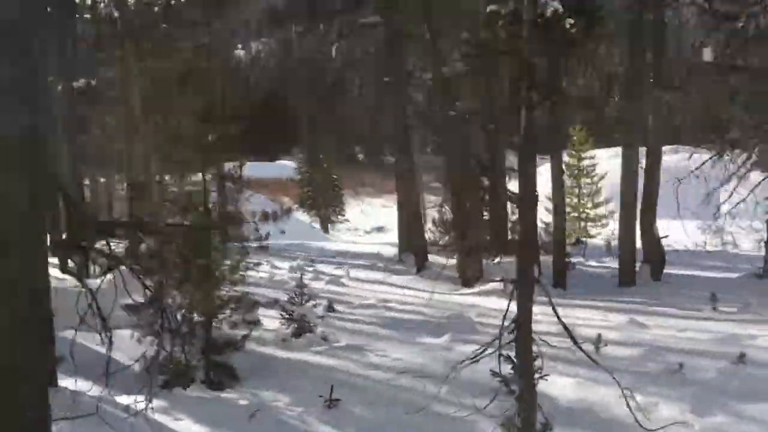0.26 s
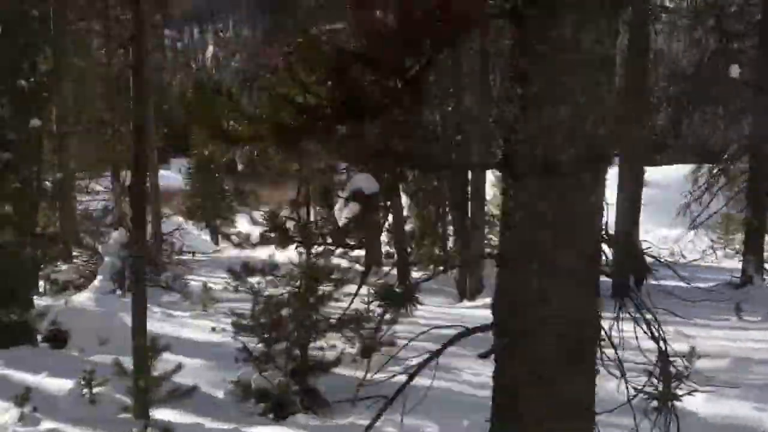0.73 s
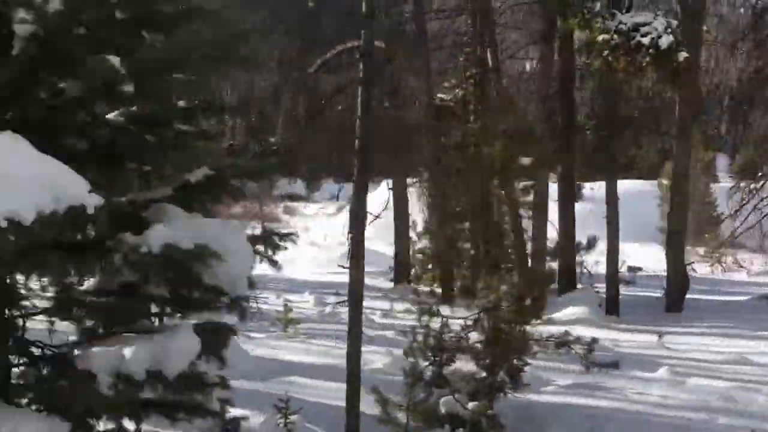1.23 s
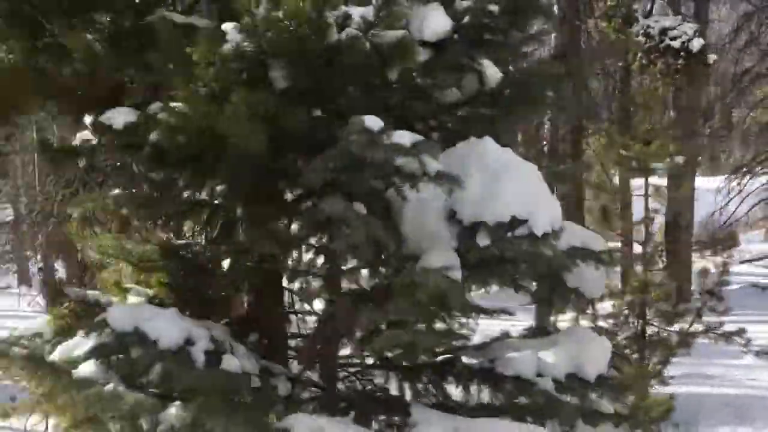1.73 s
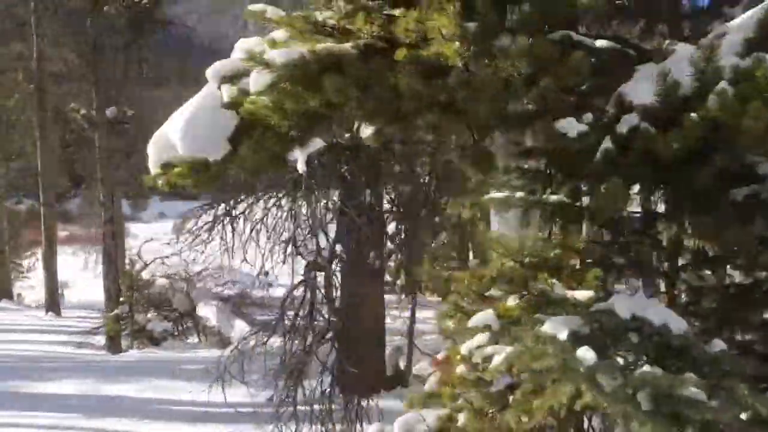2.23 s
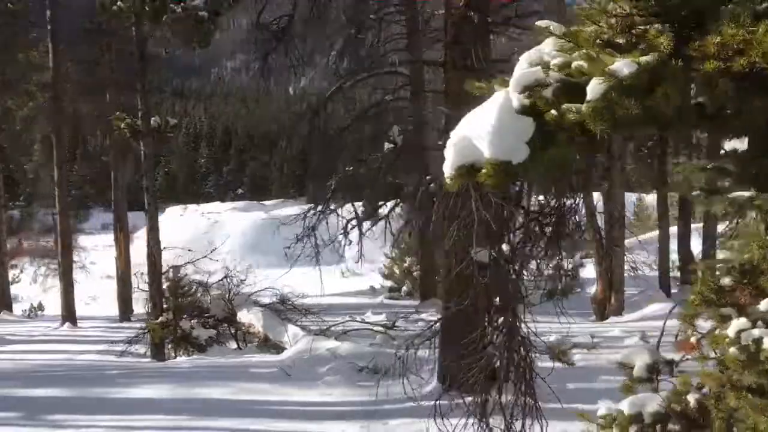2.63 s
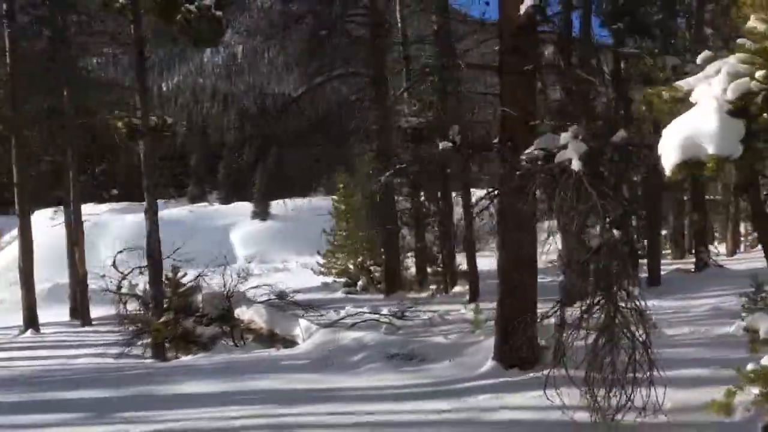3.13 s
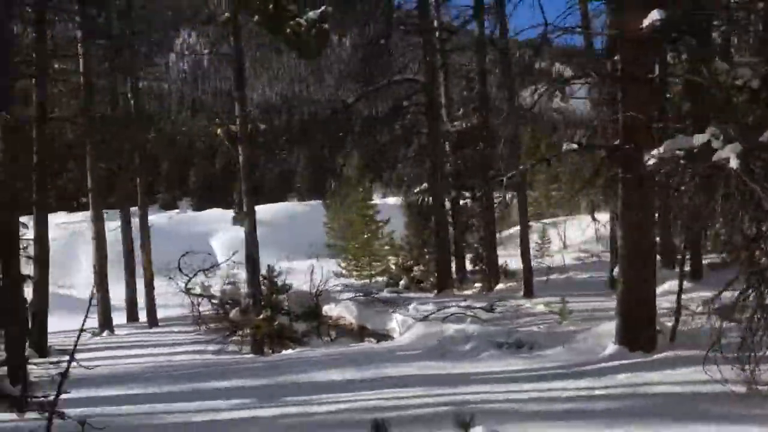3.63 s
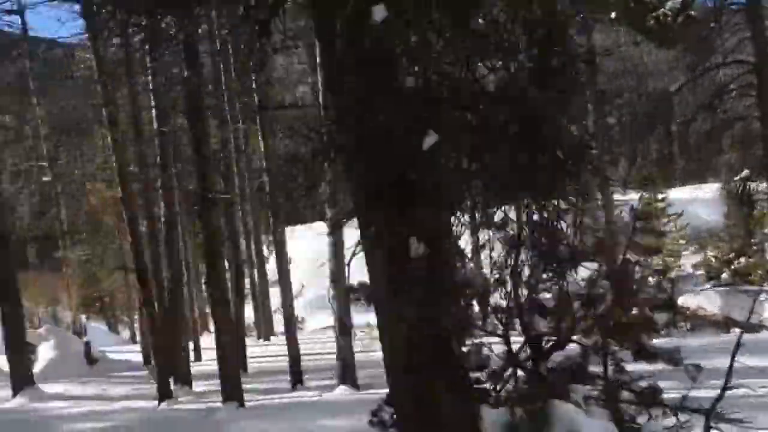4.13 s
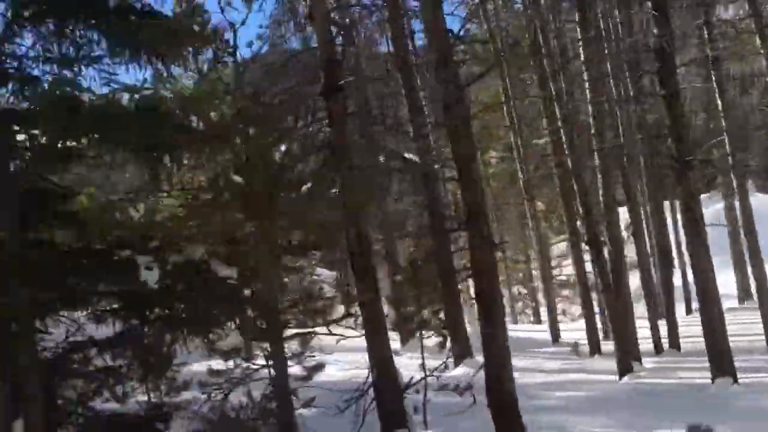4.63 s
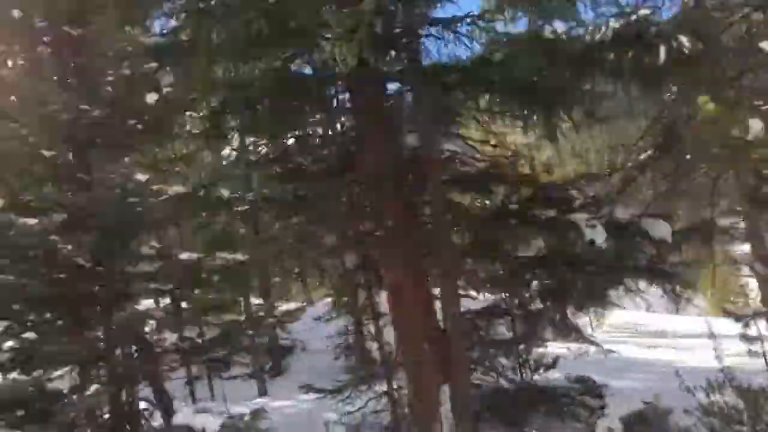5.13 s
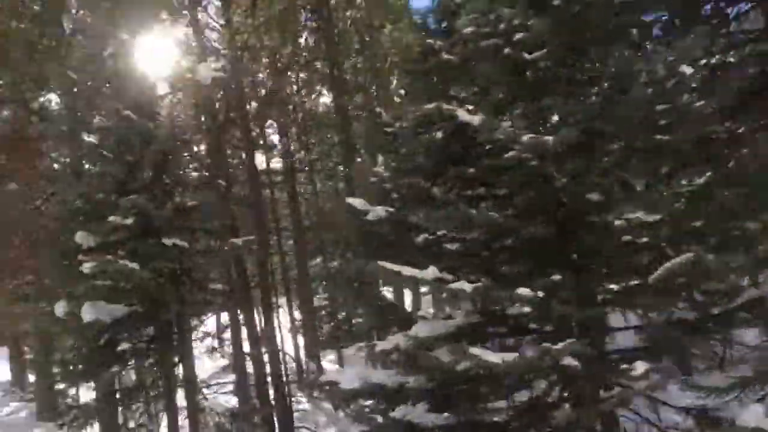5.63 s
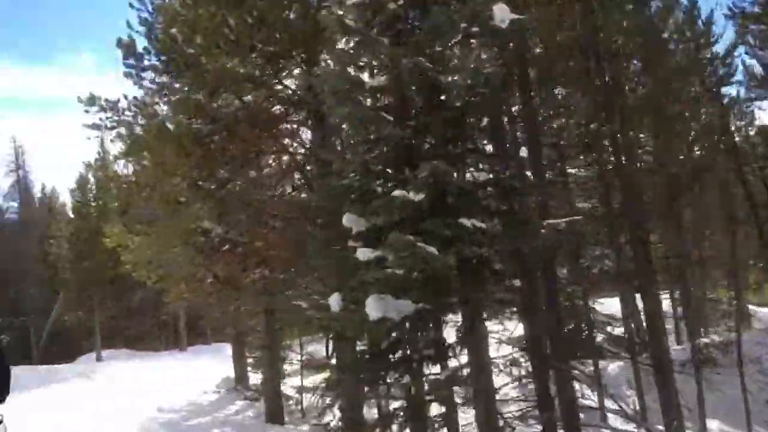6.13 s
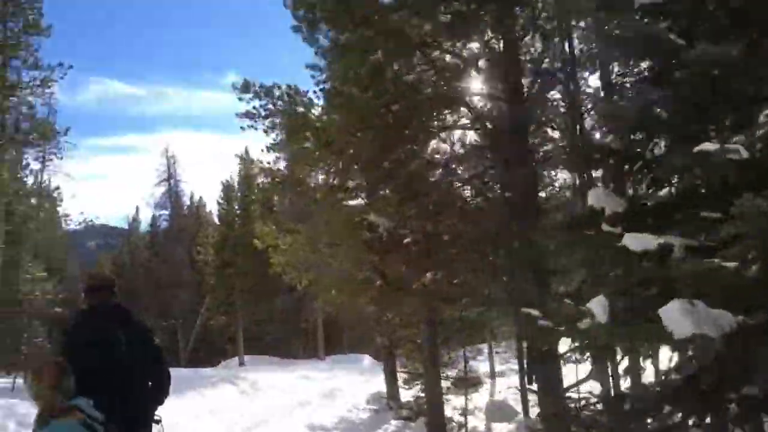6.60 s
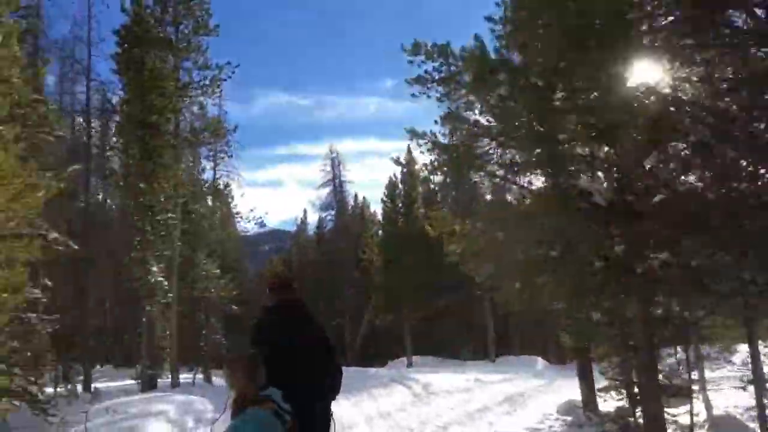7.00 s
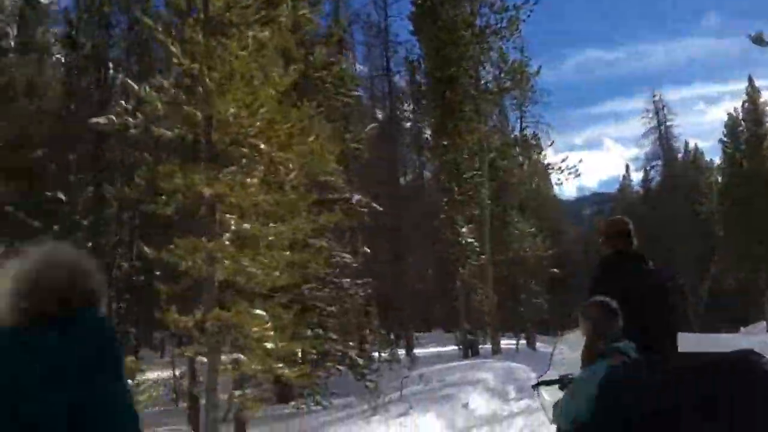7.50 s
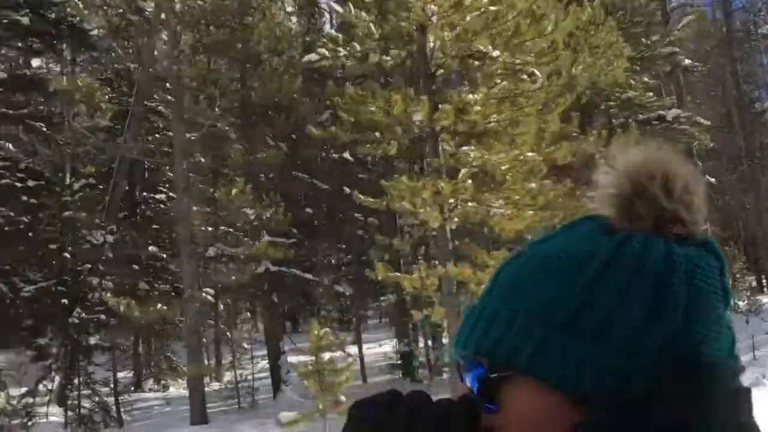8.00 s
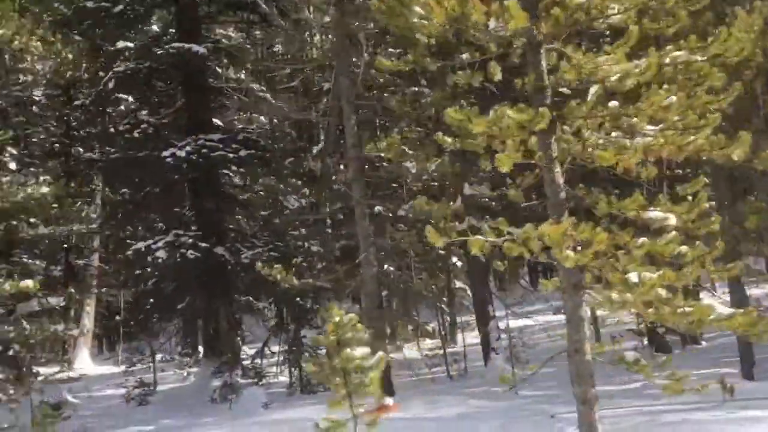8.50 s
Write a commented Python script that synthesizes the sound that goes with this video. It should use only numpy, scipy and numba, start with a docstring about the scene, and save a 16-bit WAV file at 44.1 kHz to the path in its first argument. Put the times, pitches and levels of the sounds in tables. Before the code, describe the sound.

A small engine drones low and steady as a towed sled scrapes over snow, wind gusting midway, then the engine revs higher with thumps.

```python
"""On a snowy forest trail, a sled is towed by a small three-cylinder engine droning near 90 Hz.
The exhaust is a sum of sine waves; belt, track, runners and snow are grainy noise given a tone colour.
Wind is uneven noise that buffets the microphone and swells into a gust, with two deep wind thumps.
Thumps, knocks, ticks and crackles are short dying rings; cloth rustles, metal squeaks and the drive whines."""
import sys
import numpy as np
from scipy import signal
from scipy.fft import rfft, irfft
from scipy.io import wavfile
from scipy.ndimage import uniform_filter1d
from numba import njit

SR = 44100
rng = np.random.default_rng(int(sys.argv[2]) if len(sys.argv) > 2 else 0)


def wav_out(sig):
    """Save sig, one row per channel (or a flat mono array), as 16-bit PCM at SR to the path in sys.argv[1]."""
    wavfile.write(sys.argv[1], SR, np.round(np.clip(np.atleast_2d(sig).T, -1, 1) * 32767).astype(np.int16))


N = 385875


def undb(db):
    """Turn decibels into a plain gain."""
    return 10 ** (np.asarray(db) / 20)


def unit(x):
    """Scale a signal to rms 1."""
    return x / np.sqrt(np.mean(x ** 2))


def curves(table):
    """Draw straight lines between the rows of a table; one curve for each column after the time."""
    s, *columns = np.transpose(table)
    return [np.interp(np.arange(N) / SR, s, c) for c in columns]


@njit
def svf(x, hz, k):
    """State-variable filter with a moving centre: low and band outputs; a larger k is broader."""
    low, band = np.empty(len(x)), np.empty(len(x))
    b, l = 0., 0.
    for i in range(len(x)):
        g = np.tan(np.pi * hz[i] / SR)
        v = (b + g * (x[i] - l)) / (1 + g * (g + k))
        low[i] = l + g * v
        band[i] = k * v
        b, l = 2 * v - b, l + 2 * g * v
    return low, band


def walk(rate):
    """A wandering curve: random levels held for 1 / rate seconds, smoothed twice, rms 1."""
    k = int(SR / rate)
    steps = np.repeat(rng.standard_normal(N // k + 1), k)
    smooth = uniform_filter1d(uniform_filter1d(steps, k), k)
    return unit(smooth[:N])


def colour(x, points):
    """Shape the spectrum of a sound by (Hz, dB) points; rms 1."""
    hz, db = np.transpose(points)
    f = np.maximum(np.arange(N // 2 + 1) * SR / N, 1)
    gain = undb(np.interp(np.log(f), np.log(hz), db, left=-90, right=-90))
    return unit(irfft(rfft(x) * gain, N))


def grains(rate, spread_db):
    """Noise whose loudness changes from grain to grain, at rate grains a second."""
    k = int(SR / rate)
    size = np.repeat(undb(spread_db * rng.standard_exponential(N // k + 1)), k)[:N]
    return rng.standard_normal(N) * uniform_filter1d(size, k)


def knocks(table, noisy, width, rise_cycles):
    """Each knock is a short damped ring mixed with a burst of noise around its pitch."""
    out, t = np.zeros(N), np.arange(SR // 5) / SR
    for s, db, hz, t60 in table:
        burst, centre = rng.standard_normal(len(t)), np.full(len(t), 1. * hz)
        for _ in range(2):
            burst = svf(burst, centre, width)[1]
        decay = np.exp(-np.log(1000) * t / max(t60, .002))
        ring = (np.sin(2 * np.pi * hz * t) + noisy * unit(burst)) * decay
        rise = np.minimum(t * hz / rise_cycles, 1)
        i = int(s * SR)
        out[i:i + len(t)] += undb(db) * ring * rise
    return out


# How fast the engine fires. Each row: time in seconds, firing rate in Hz (which then wavers slightly).
FIRING_RATE = [(0, 84), (.75, 83.9), (1, 83.2), (1.3, 81.4), (1.5, 81.7), (1.8, 83.8), (2.6, 84.1),
               (3, 82.4), (3.75, 80.7), (4.25, 83.5), (4.8, 86.2), (5.3, 85), (5.55, 85.2), (5.9, 87.4),
               (6.5, 96.4), (6.75, 97.2), (7.75, 95.5), (8.25, 95.8), (8.75, 94.3)]
# Firing tone, which sinks while the gust blows and grows with the throttle.
# Each row: time in seconds, rms level in dB (which then wavers slightly).
FIRING_TONE = [(0, -17.5), (.27, -19), (1.5, -19.5), (2.5, -19), (2.72, -23.5), (2.85, -19), (3.04, -27.5),
               (3.34, -23), (3.7, -32), (3.88, -26.5), (3.97, -34), (4.15, -22), (4.24, -31), (4.48, -16.5),
               (5.2, -15.5), (5.34, -17.5), (6.45, -12), (7.3, -12.5), (7.48, -13.5), (7.6, -11),
               (7.97, -14.5), (8.26, -12), (8.75, -13)]
# How well the overtones carry. Each row: time in seconds, middle rms level of the octave in dB,
# shift of the lower multiples in dB, shift of the higher multiples in dB.
OVERTONES = [(0, -32.5, -5.5, -0.5), (1, -32.5, -1.5, -4.5), (1.4, -30.5, 4.5, -1.5),
             (2, -32.5, -2.5, -2.5), (2.5, -40.5, -6, -7), (3.3, -32, -10, -8), (4.2, -34.5, 1.5, -7),
             (5.1, -39, -7, 1), (5.35, -30.5, -1.5, -3), (5.8, -36, 0, 2), (6.2, -46, 3.5, -.5),
             (6.9, -38.5, 7.5, -0.5), (7.3, -42.5, -9, 3.5), (8, -48, -15, -3), (8.75, -39, -11, -10)]
# Three cylinders fire unevenly, so these multiples of the full cycle's rate sound too.
MULTIPLES = [2, 9, 10, 11, 12, 13, 14, 15, 18, 21, 23, 25, 27, 28, 29, 30, 32, 33, 35, 36, 37, 40]
# Rms level in dB of each multiple when cruising, before the shift and a waver.
CRUISE_DB = [-37.5, -45.5, -64.5, -49, -46, -60.5, -52, -51.5, -71.5, -62, -63, -59, -66, -76, -66, -60.5,
             -58.5, -66, -62.5, -61, -64, -60.5]
# Rms level in dB of each multiple at full throttle, before the shift and a waver.
FULL_DB = [-47, -62, -49.5, -54, -53, -56.5, -70, -71, -57.5, -65.5, -58, -63.5, -52.5, -53, -54, -54.5,
           -60.5, -52.5, -58, -61, -59, -59.5]


def engine():
    """An almost pure firing tone from the tuned pipe; the thirds between its overtones come and go."""
    hz, = curves(FIRING_RATE)
    tone_db, = curves(FIRING_TONE)
    octave_db, low_db, high_db = curves(OVERTONES)
    octave_db += 2.5 * walk(10)
    throttle = np.clip((hz - 87) / 8, 0, 1)  # opens from 87 to 95 Hz
    # phase of one full cycle, in which all three cylinders fire
    cycle = 2 * np.pi * np.cumsum(hz * (1 + .002 * walk(12))) / SR / 3
    out = undb(tone_db + .6 * walk(25)) * np.sin(3 * cycle)
    out += undb(octave_db) * np.cos(6 * cycle)
    for multiple, cruise_db, full_db in zip(MULTIPLES, CRUISE_DB, FULL_DB):
        swell = walk(4)
        shift_db = low_db if multiple < 17 else high_db
        db = cruise_db + (full_db - cruise_db) * throttle + shift_db
        out += undb(db + 1.6 * swell) * np.sin(multiple * cycle + swell)
    return np.sqrt(2) * out  # makes each level above an rms level


# Running gear. Each row: time in seconds, rattle in dB (lowered 1.5 later), drivetrain growl in dB
# (raised 3 later), scrape of the runners in dB, hiss of snow in dB, rustle of air in dB (raised 4 later).
GEAR = [(0, -42.5, -49.5, -58, -52.5, -64), (.45, -45.5, -48.5, -52.5, -55.5, -64),
        (.6, -44, -49.5, -53.5, -57, -66), (1.1, -44, -48.5, -51.5, -56, -67),
        (1.25, -46, -51, -51, -58.5, -67), (2.75, -44, -51.5, -53, -58, -72.5),
        (2.9, -48.5, -51.5, -52.5, -57.5, -70), (3.35, -46.5, -56, -53, -56.5, -67),
        (3.9, -47.5, -58, -53.5, -58.5, -71), (4.25, -41, -48, -53, -57, -67),
        (4.6, -42.5, -46, -54, -52, -65), (5, -39.5, -44.5, -54, -52.5, -66),
        (5.7, -40.5, -45.5, -53.5, -51.5, -61.5), (6.5, -40, -44.5, -54.5, -52, -61.5),
        (7.05, -39.5, -44, -52.5, -56, -65.5), (7.6, -40.5, -44, -52, -56, -63),
        (8.3, -43.5, -48, -52.5, -59, -64.5), (8.75, -44.5, -50.5, -55, -58, -67)]


def gear():
    """Drivetrain, track and runners sound together; one shared shake moves the rattle and scrape."""
    rattle_db, growl_db, scrape_db, hiss_db, rustle_db = curves(GEAR)
    shake = walk(22)
    solid = growl(growl_db) + rattle(rattle_db, shake) + scrape(scrape_db, shake)
    return solid + hiss_and_rustle(hiss_db, rustle_db)


# Tone colour of the growl. Each row: frequency in Hz, relative level in dB.
GROWL = [(140, -26), (230, -21), (349, -3), (437, -4), (520, -7.5), (699, -5.5), (794, -9.5), (1030, -7.5),
         (1220, -9.5), (1400, -6.5), (1820, -40.5), (3080, -120)]


def growl(level_db):
    """The drivetrain growls as low, coarse-grained noise."""
    return undb(level_db + 3 + 0.4 * walk(7.8)) * colour(grains(150, 0.92), GROWL)


# Tone colour of the rattle. Each row: frequency in Hz, relative level in dB.
RATTLE = [(710, -38.5), (1200, -14), (1400, -11), (1490, -1.5), (1580, 0.5), (1840, -2.5), (2060, -9.5),
          (2270, -12.5), (2500, -21), (3250, -50), (5500, -120)]
# Panels that ring with the rattle. Each row: pitch in Hz, width in Hz, level in dB relative to
# the plain rattle, time in seconds when loudest, seconds from there until it has sunk to about a third.
PANELS = [(1513, 35, -7, 3.6, 3.7), (1588, 51, -4.5, 6.66, 0.58), (1675, 18, -13.5, 0.39, 0.8),
          (1518, 22, -7, 1.46, .3), (1725, 36, -12.5, 5.3, .8), (1873, 22, -7.5, 8.4, 0.88),
          (1840, 24, -11.5, 2.6, 1.4), (2490, 69, -17.5, 2.6, 3.1), (2935, 33, -29, 11, 3),
          (3220, 99, -10, 3.2, 1), (4450, 120, -17, 5.9, 1), (4580, 68, -22.5, 6.2, 0.65),
          (6430, 100, -18.5, 5.6, 0.86), (966, 32, -3.5, 7.23, 0.76)]


def rattle(level_db, shake):
    """Track lugs shake the chassis: grainy noise rattles and sets narrow panel resonances ringing."""
    t = np.arange(N) / SR
    lugs = grains(300, 1.57)
    out = colour(lugs, RATTLE)
    for hz, width_hz, db, peak_s, span_s in PANELS:
        ring = svf(lugs, hz * (1 + 0.0021 * walk(5.4)), width_hz / hz)[1]
        swell = np.exp(-((t - peak_s) / span_s) ** 2)
        out += undb(db + 2.5 * walk(14)) * swell * unit(ring)
    return undb(level_db - 1.5 + 0.71 * shake) * out


# Tone colour of the scrape. Each row: frequency in Hz, relative level in dB.
SCRAPE = [(1290, -30), (2200, 0.5), (2550, -2), (2720, -2), (3170, -2), (3440, -7), (4200, -10.5),
          (5460, -38), (9240, -120)]


def scrape(level_db, shake):
    """Runners scrape along as fine-grained noise that wavers in level."""
    return undb(level_db + 1.36 * walk(5) + 0.2 * shake) * colour(grains(600, 1.2), SCRAPE)


# Tone colour of the snow's hiss. Each row: frequency in Hz, relative level in dB.
HISS = [(2290, -32), (3900, -2.5), (4540, -3.5), (4990, -5), (6560, -6.5), (7040, -9.5), (9570, -13.5),
        (10400, -25), (11000, -19), (14300, -46), (22000, -120)]
# Tone colour of the airy rustle. Each row: frequency in Hz, relative level in dB.
RUSTLE = [(2940, -30.5), (5000, -5.5), (5220, -1.5), (5650, -3), (6130, -2.5), (6900, -3), (9080, -3),
          (10400, -3.5), (11100, -5), (15500, -7.5)]


def hiss_and_rustle(hiss_db, rustle_db):
    """Snow, air and cloth hiss in very fine grains; brushing cloth strengthens both layers."""
    spray, brush = walk(30), cloth()
    hiss_gain = np.hypot(undb(hiss_db), undb(0.5) * brush) * undb(0.44 * spray)
    rustle_gain = np.hypot(undb(rustle_db), brush) * undb(4 + 0.36 * spray)
    hiss = hiss_gain * colour(grains(900, 1.2), HISS)
    return hiss + rustle_gain * colour(grains(900, 1.0), RUSTLE)


# Cloth brushing near the microphone. Each row: start in seconds, length in seconds,
# level in dB (raised 0.5 in the hiss and 4 in the rustle).
CLOTH = [(3.025, 0.34, -60.5), (7.42, .33, -65), (7.926, .2, -60.5), (8.35, .12, -66)]


def cloth():
    """Gain of the cloth: a quick fade in, a hold, a quick fade out."""
    t, edge_s = np.arange(N) / SR, .02
    gain = np.zeros(N)
    for s, length, db in CLOTH:
        gain += undb(db) * np.clip(np.minimum(t - s, s + length - t) / edge_s, 0, 1)
    return gain


def swells(times, dbs, width_s):
    """Gain that swells and sinks around each given moment."""
    out, t = np.zeros(N), np.arange(-SR // 5, SR // 5)
    for s, db in zip(times, dbs):
        i = int(s * SR) + t
        inside = (i >= 0) & (i < N)
        out[i[inside]] += (undb(db) * np.exp(-(t / SR / width_s) ** 2))[inside]
    return out


# Strength of the wind on the microphone. Each row: time in seconds, gust level in dB (before flutter).
WIND = [(0, -41.5), (.45, -38), (.75, -38.5), (1.05, -38), (1.7, -36.5), (1.9, -39.5), (2.15, -31.5),
        (2.3, -31), (2.45, -37), (2.9, -33.5), (3.2, -32.5), (3.3, -26), (3.4, -29.5), (3.55, -28.5),
        (3.68, -22), (3.9, -25.5), (4.17, -26.5), (4.24, -42), (4.3, -30.5), (4.46, -42), (5.2, -43),
        (5.45, -37.5), (6.05, -38), (6.5, -41.5), (7, -39), (7.3, -42), (8.2, -42.5), (8.45, -39),
        (8.75, -39)]
# Moments when the wind's rumble or buffeting swells. Each row: time in seconds, peak rumble gain in dB,
# peak buffeting gain in dB (before flutter); both join a steady gain.
WIND_SWELLS = [(.49, -23, -40), (1.12, -27, -30), (2.12, -23, -32), (2.44, -21, -38), (2.55, -22, -23),
               (2.86, -22, -31), (3.27, -23, -23.5), (3.78, -38, -20), (4.09, -39, -23), (4.33, -25, -25.5),
               (4.92, -23, -27.5), (5.33, -24, -43), (5.99, -26, -36), (6.84, -25, -32), (7.1, -19.5, -38),
               (7.59, -23, -34), (7.89, -26, -27.5), (8.23, -22, -39), (8.45, -21, -22), (8.7, -19.5, -32)]


def wind():
    """Wind rumbles and buffets with brief swells; the stronger the gust, the higher its flutter reaches."""
    gust_db, = curves(WIND)
    s, swell_rumble_db, swell_buffet_db = np.transpose(WIND_SWELLS)
    puffs = walk(70)

    # the steady rumble weakens as the gust grows
    rumble_db = -29 - 0.47 * np.maximum(gust_db + 35.5, 0) + 2 * walk(14)
    rumble_gain = np.hypot(undb(rumble_db), swells(s, swell_rumble_db, 0.063))
    rumble_points = [(18, -35), (35, -9), (55, -4), (68, 2.0), (80, -7), (110, -23.0)]
    rumble = rumble_gain * colour(rng.standard_normal(N), rumble_points)

    # the steady buffeting strengthens with the gust
    buffet_db = -31 + 0.35 * (gust_db + 34) + 2.5 * walk(12)
    buffet_gain = np.hypot(undb(buffet_db), swells(s, swell_buffet_db, 0.057)) * undb(1.6 * puffs)
    buffet_points = [(75, -25.5), (110, 5.0), (135, -0.5), (180, -4.5), (240, -15.5), (350, -39)]
    buffet = buffet_gain * colour(rng.standard_normal(N), buffet_points)

    edge_hz = np.clip(260 * undb(0.3 * (gust_db + 25.5) + 0.89 * puffs), 60, 3000)
    gust = svf(rng.standard_normal(N), edge_hz, 1.8)[0]
    gust = svf(gust, 1.57 * edge_hz, 1.94)[0]
    gust = signal.sosfilt(signal.butter(2, 170, "high", fs=SR, output="sos"), gust)
    gust /= np.sqrt(uniform_filter1d(gust ** 2, SR // 5))  # even loudness before the gust curve
    return rumble + buffet + undb(gust_db + 1.2 * puffs) * gust


# Puffs within the gust. Each row: start in seconds, level in dB of the upper ring.
THUDS = [(2.333, -40), (2.727, -36), (2.863, -29), (3.263, -28), (3.304, -36), (3.325, -25), (3.585, -28),
         (3.631, -18.5), (3.654, -23.5), (3.674, -16.5), (3.721, -22), (3.759, -20), (3.818, -22),
         (3.838, -16), (3.881, -25), (3.927, -24), (3.983, -24), (4.039, -24), (4.079, -28)]


def gust_puffs():
    """Each puff thuds as a noisy ring at 546 Hz over a longer, noisier body at 190 Hz."""
    upper = [(s, db, 546, 0.028) for s, db in THUDS]
    body = [(s, db - 3, 190, 0.056) for s, db in THUDS]
    out = knocks(upper, noisy=0.51, width=0.51, rise_cycles=1.2)
    return out + knocks(body, noisy=1.14, width=0.67, rise_cycles=0.5)


# Two deep wind thumps on the microphone. Each row: start in seconds, level in dB.
WIND_THUMPS = [(7.4, -5), (8.052, -4)]


def wind_thumps():
    """Each deep thump is a ring at 52 Hz that dies away by 60 dB in 0.18 s."""
    table = [(s, db, 52, 0.18) for s, db in WIND_THUMPS]
    return knocks(table, noisy=0.29, width=0.6, rise_cycles=.7)


# Hollow knocks. Each row: start in seconds, level in dB, pitch in Hz, seconds to die away by 60 dB.
KNOCKS = [(.61, -34, 555, 0.13), (2.389, -29.5, 530, .09), (7.24, -31, 413, 0.14),
          (7.371, -17.5, 523, 0.035), (7.373, -12, 200, 0.04), (7.385, -20, 574, 0.032),
          (7.386, -12.5, 270, 0.025), (7.59, -28, 450, 0.11), (7.63, -26.5, 220, 0.15),
          (7.855, -23, 217, 0.12), (7.86, -30, 319, 0.069), (8.1, -33, 480, .07), (8.18, -32, 470, .07),
          (8.42, -28, 308, .08)]


def hollow_knocks():
    """Low, mostly tonal rings with a little noise."""
    return knocks(KNOCKS, noisy=0.13, width=0.29, rise_cycles=0.39)


# Small metal parts. Each row: start in seconds, level in dB, pitch in Hz, seconds to die away by 60 dB.
TICKS = [(.38, -41, 8850, .008), (.382, -34, 1700, .01), (.413, -33, 1530, .04), (.775, -35, 1660, .04),
         (.96, -28.5, 1700, 0.011), (1.036, -26, 1780, 0.0088), (1.044, -34, 1800, .008),
         (5.045, -41, 7700, .008), (5.051, -44, 9900, .02), (5.197, -51, 9800, .02),
         (5.224, -51, 9800, .03), (5.272, -52, 9800, .015), (5.359, -49, 9800, .02)]


def ticks():
    """Small metal parts tick as high, short, partly noisy rings."""
    return knocks(TICKS, noisy=0.54, width=0.57, rise_cycles=0.25)


# Snow crackles. Each row: start in seconds, level in dB.
CRACKLE = [(.425, -31), (.7632, -42), (.8455, -39), (0.971, -39), (1.1074, -45), (2.628, -45),
           (3.2206, -40), (5.045, -35)]


def crackles():
    """Very short, mostly noisy snaps around 3820 Hz."""
    table = [(s, db, 3820, 0.0064) for s, db in CRACKLE]
    return knocks(table, noisy=1.34, width=1.7, rise_cycles=.6)


def squeak():
    """A thin, brief metal squeak: one high sine wave with a fluttering level."""
    t, start_s, end_s = np.arange(N) / SR, 3.458, 3.55
    gate = np.clip(np.minimum(t - start_s, end_s - t) / .004, 0, 1)
    return gate * undb(-62 + 4.3 * walk(60)) * np.sin(2 * np.pi * 10685 * t)


# Gliding drive tones. Each row: start in seconds, end in seconds (may lie past the end of the sound),
# starting pitch in Hz, ending pitch in Hz, level in dB; pitch and level then waver.
WHINE = [(7.8, 9.2, 425, 475, -46), (4.3, 6.3, 1122, 1092, -50)]


def whine():
    """Gliding sine tones that fade at their ends and waver in pitch and strength."""
    t, out = np.arange(N) / SR, np.zeros(N)
    for t0, t1, hz0, hz1, db in WHINE:
        hz = np.interp(t, [t0, t1], [hz0, hz1]) * (1 + .004 * walk(7.7))
        phase = 2 * np.pi * np.cumsum(hz) / SR
        fade = np.clip(np.minimum(t - t0, t1 - t) / 0.12, 0, 1)
        out += fade * undb(db + 1.5 * walk(9)) * np.sin(phase)
    return out


def scene():
    """Add up all the sources as one channel."""
    steady = engine() + gear() + wind() + whine()
    hits = gust_puffs() + wind_thumps() + hollow_knocks() + ticks() + crackles()
    return (steady + hits + squeak())[None]


# Hollows in the microphone's response. Each row: centre in Hz, width in Hz.
CASE_DIPS = [(5000, 290), (10450, 780)]


def record(dry):
    """The microphone's case cuts two hollows in the treble; the recorder cuts off the top."""
    for hz, width_hz in CASE_DIPS:
        dry = dry - 0.33 * svf(dry[0], np.full(N, 1. * hz), width_hz / hz)[1]
    top_cut = signal.ellip(12, .2, 80, 15650, fs=SR, output="sos")  # steep edge at 15650 Hz
    return signal.sosfilt(top_cut, dry)


dry = scene()
out = record(dry)
wav_out(out)
```